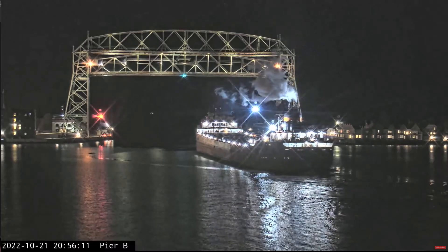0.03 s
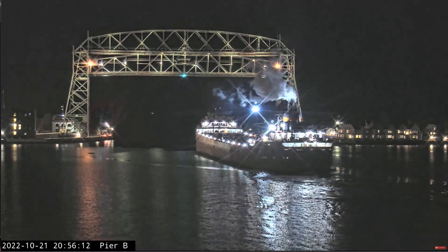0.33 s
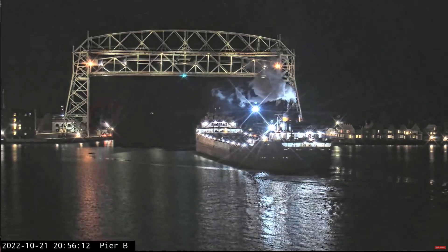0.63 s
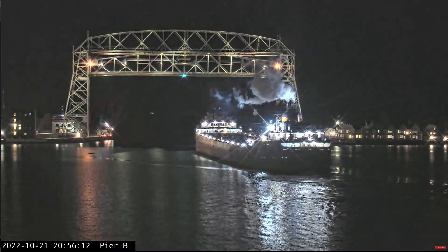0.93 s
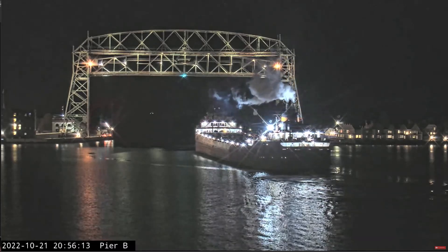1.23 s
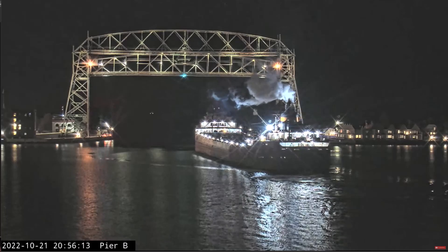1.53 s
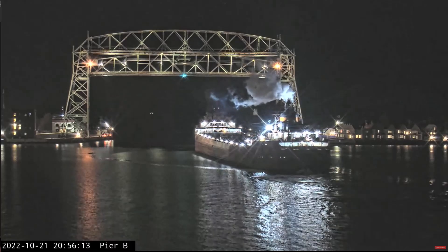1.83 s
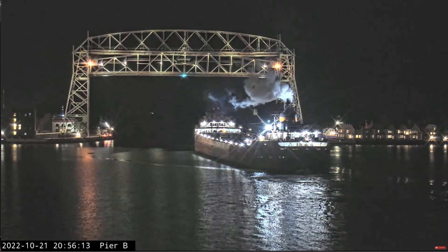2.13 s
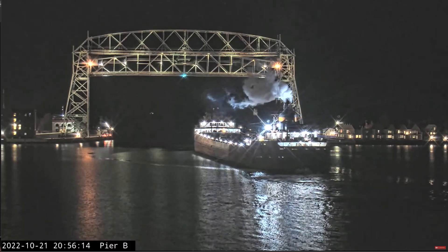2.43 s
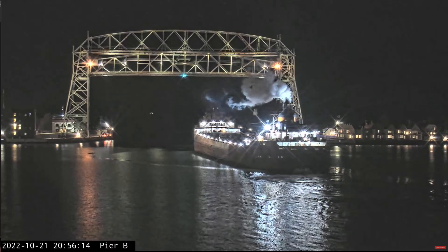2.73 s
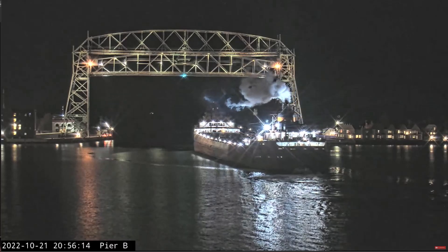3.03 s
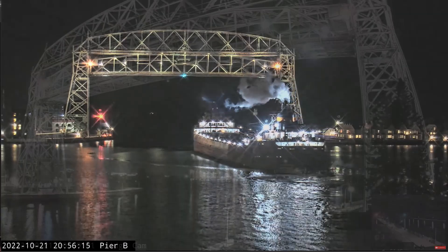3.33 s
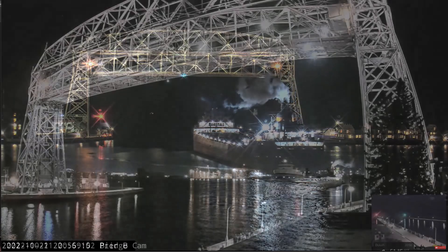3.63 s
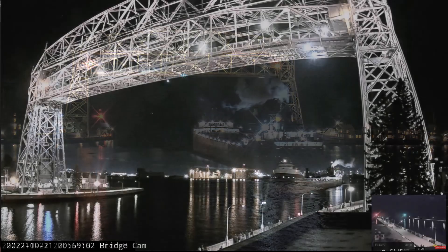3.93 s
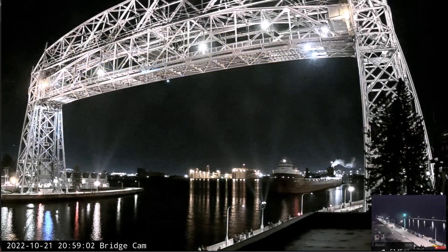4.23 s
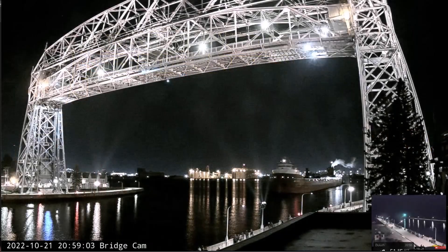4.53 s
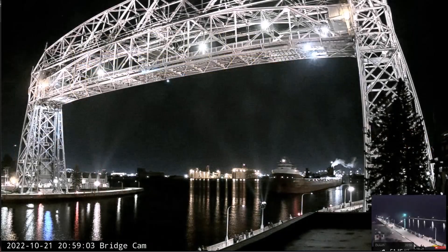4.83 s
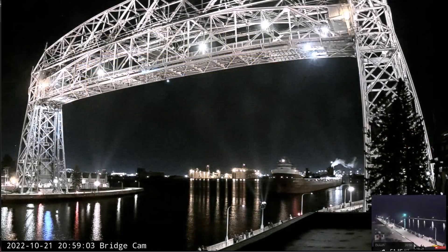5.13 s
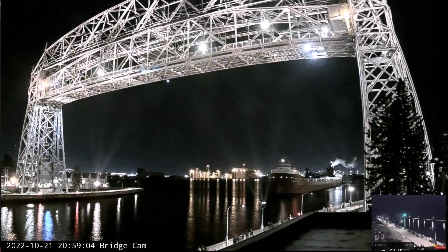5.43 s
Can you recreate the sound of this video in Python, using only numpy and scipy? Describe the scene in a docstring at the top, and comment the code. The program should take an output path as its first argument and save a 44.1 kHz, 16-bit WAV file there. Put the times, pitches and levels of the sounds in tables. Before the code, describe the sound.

Low steady harbor rumble and ship engine hum, interrupted by two thumping pops, then a brief hiss and an overloaded horn blast.

```python
"""A harbour at night, heard across the water. Far off a freighter's diesel drones under a steady rush.
At 1.0 s and 3.5 s two low electrical pops with a thin buzz cut in; faint, distant squeaks follow.
At 5.2 s compressed air hisses and whistles through a valve, and a large air horn speaks:
its diaphragm chops the air into a brassy note that scoops up to pitch and echoes off the quays,
so loud at the microphone that the input overloads."""
import sys
import numpy as np
from scipy import signal
from scipy.fft import rfft, irfft
from scipy.io import wavfile

SR = 44100
rng = np.random.default_rng(int(sys.argv[2]) if len(sys.argv) > 2 else 0)


def int16_out(signal):
    """Quantize to a 16-bit WAV file."""
    q = np.round(np.clip(np.atleast_2d(signal).T, -1, 1) * 32767)
    wavfile.write(sys.argv[1], SR, q.astype(np.int16))


N = 250047
TIME = np.arange(N) / SR
BINS = np.fft.rfftfreq(N, 1 / SR)
NOTE_HZ, BAND_LIMIT_HZ = 131.68, 15800
VALVE_S, FULL_SWING_S = 5.245, 5.374  # the valve cracks open; the diaphragm's swing levels off
BLAST = slice(round(VALVE_S * SR), N)


# The air horn at full pressure, loudest thing at the microphone: multiple of the pitch, relative level/dB
HORN_HARMONICS = [(1, -18.4), (2, -12.6), (3, -31), (4, -8.2), (5, -27.5), (6, -17.7), (7, -21.2),
                  (8, -19.5), (9, -20.5), (10, -22.3), (11, -43.6), (12, -33.3), (13, -37.1), (14, -26.7),
                  (15, -34.3), (16, -38), (17, -29), (18, -31.6), (19, -43.5), (20, -48.8), (21, -44),
                  (22, -42.5), (23, -41), (24, -39), (25, -45), (26, -64.0)]

def horn(scoop_hz=15, scoop_s=0.0121, waver=0.0007, dull_db_per_octave=9.5, shimmer_db=2.5):
    """The diaphragm chops the air; as its swing builds, the pitch rises and the tone brightens."""
    strength_db = 0.45 + swing_db()[BLAST]
    pitch = NOTE_HZ - scoop_hz * (1 - rise(FULL_SWING_S, scoop_s)[BLAST])
    pitch *= 1 + waver * drift(60, BLAST)
    angle = 2 * np.pi * np.cumsum(pitch) / SR
    # at low pressure the upper partials are weak
    tilt_db = -dull_db_per_octave * (1 - rise(middle_s=5.369, ease_s=.007)[BLAST])
    out = np.zeros(N)
    for k, db in HORN_HARMONICS:
        lag = 2.94 * np.log(k)  # phases are spread over the cycle to keep the peaks low
        shimmer = shimmer_db * k / len(HORN_HARMONICS) * drift(18, BLAST)  # from moving air
        level = gain_of(db + strength_db + tilt_db * np.log2(k) + shimmer)
        out[BLAST] += level * np.sin(k * (angle - lag))
    out[BLAST] += rasp(angle - lag, strength_db, tilt_db)
    return out


def swing_db(growth_db_per_s=433, knee_db=2):
    """The diaphragm's swing relative to its full size: steady growth that levels off."""
    return -knee_db * np.logaddexp(0, growth_db_per_s * (FULL_SWING_S - TIME) / knee_db)


# Rasp of the overloaded note, above the horn's main partials: f/Hz, relative level/dB
RASP_SPECTRUM = [(3500, -52), (4150, -48), (4500, -52), (5100, -46.5), (5700, -54.5), (7000, -52),
                 (7800, -61), (8600, -56.5), (9600, -64), (12500, -63.5), (15800, -69)]

def rasp(angle, strength_db, tilt_db, jitter_rad=0.0048, hiss_db=-45.5, pulse_depth=0.93):
    """Rough, buzzing treble of the overloaded note: ragged upper partials and hiss pulsing at the pitch."""
    jittered = angle + jitter_rad * drift(120, BLAST)
    partials = np.zeros_like(angle)
    for k in range(len(HORN_HARMONICS) + 1, int(BAND_LIMIT_HZ / NOTE_HZ)):
        db = 0.65 + level_at(RASP_SPECTRUM, k * NOTE_HZ) + strength_db + tilt_db * np.log2(k)
        ragged = .9 * rng.standard_normal()
        partials += gain_of(db) * np.sin(k * jittered + ragged)
    low_cut = 1 - np.exp(-(BINS / 2500) ** 4)
    hiss = noise(gain_of(level_at(RASP_SPECTRUM, BINS)) * low_cut)[BLAST]
    pulsing = gain_of(hiss_db + strength_db + tilt_db) * (1 - pulse_depth * np.sin(jittered))
    return partials + pulsing * hiss


# Rushing air, as coloured by the horn's flare: f/Hz, relative level/dB
FLARE_SPECTRUM = [(30, -6), (90, -4), (200, -9), (300, -2), (380, -8), (500, 1), (620, 1), (760, -9),
                  (1300, -11), (1480, -16), (1780, -12), (2130, -14), (2400, -21), (3500, -33), (7000, -40),
                  (16000, -54)]

def valve_air(leak_db=-45.5, leak_rise_s=.08, flow_db=-33.5):
    """Compressed air leaks in as the valve opens, then flows with the swing under the tone."""
    leak = gain_of(leak_db) * np.clip((TIME - VALVE_S) / leak_rise_s, 0, 1)
    flow = gain_of(flow_db + swing_db())
    return (leak + flow) * noise(gain_of(level_at(FLARE_SPECTRUM, BINS)))


# Resonances that the leaking air whistles in, at the horn: f/Hz, width/Hz, level/dB
VALVE_RESONANCES = [(2080, 120, -56), (1774, 130, -52.5), (1270, 90, -57), (585, 52, -48)]

def valve_whistles(rise_s=0.032):
    """The opening valve squeals until the diaphragm takes the air."""
    level = np.clip((TIME - VALVE_S) / rise_s, 0, 1) * (1 - gain_of(swing_db()))
    return level * sum(gain_of(db) * band(hz, width) for hz, width, db in VALVE_RESONANCES)


# The quays around the microphone, time for their echo to fall 60 dB: f/Hz, t/s
QUAY_DECAY = [(130, 1.8), (600, 1.5), (2500, 0.98), (8000, 0.16)]

def quay_echoes(blast, delay_s=0.017):
    """Scattered echoes from quays and bridge, the treble dying first."""
    hz, t, spectrum = signal.stft(rng.standard_normal(SR), SR, nperseg=256)
    decay = gain_of(-60 * t / level_at(QUAY_DECAY, hz)[:, None])
    tail = signal.istft(spectrum * decay, SR, nperseg=256)[1]
    tail = np.pad(tail / np.linalg.norm(tail), (round(delay_s * SR), 0))
    return signal.fftconvolve(blast, tail)[:N]


# Two low electrical pops with a thin buzz, cutting into the signal over the harbour sound:
# t/s, drop level/dB, recovery/s, spike as a share of the drop, buzz level/dB, buzz length/s
ELECTRICAL_POPS = [(1.048, -10.5, 0.043, .1, -49, 0.0084), (3.5142, -19, 0.034, 1.5, -51, 0.017)]

def pops(rise_s=0.0051, spike_s=0.006, rebound=0.27, rebound_s=0.069, buzz_hz=2930, grit=0.46):
    """At each glitch the signal drops, creeps back and overshoots; a gritty buzz rides on its edge."""
    out = np.zeros(N)
    angle = 2 * np.pi * buzz_hz * TIME + 0.27 * drift(300)
    buzz = unit_rms(sum(gain_of(-2.5 * k) * np.cos(k * angle) for k in range(1, 5)))
    buzz *= 1 + gain_of(-18) * 2 * np.cos(angle / 3)  # every third cycle is a little stronger
    for start, db, recovery_s, spike, buzz_db, buzz_s in ELECTRICAL_POPS:
        t = np.maximum(TIME - start, 0)
        onset = 1 - np.exp(-(t / rise_s) ** 2)
        drop = onset * (np.exp(-t / recovery_s) + spike * np.exp(-(t / spike_s) ** 2 / 2))
        overshoot = rebound * (t / rebound_s) ** 2 * np.exp(-t / rebound_s)
        edge = rise(start, ease_s=0.0014) / (1 + (t / buzz_s) ** 6)
        out += gain_of(db) * (overshoot - drop)
        out += gain_of(buzz_db) * edge * (buzz + grit * edge * rng.standard_normal(N))
    return out


# Tones of the freighter's machinery, far from the microphone: f/Hz, wander/Hz, rms level/dB
ENGINE_TONES = [(63.5, 1.8, -54), (77.4, 0.54, -51.5), (83.1, 0.9, -50.5), (85, 0.942, -56),
                (151.5, 1.15, -62), (175, 0.57, -64), (200.8, 0.83, -57.3), (214.7, 2.145, -60),
                (276, 1.42, -65.5), (283, 0.9, -59.5), (311, 0.99, -71), (589, 2.85, -68.5),
                (1273, 22, -75), (1740, 25, -81.5)]

def freighter(flutter_db=2.0):
    """The diesel and its fans drone, wavering a little across the water."""
    out = np.zeros(N)
    for hz, wander, db in ENGINE_TONES:
        angle = 2 * np.pi * (np.cumsum(hz + wander * drift(4)) / SR + rng.random())
        out += gain_of(db + flutter_db * drift(5)) * np.sqrt(2) * np.sin(angle)
    return out


# The harbour's bed of sound, a low rush and the hiss above it: f/Hz, relative level/dB
RUSH_SPECTRUM = [(4, 2), (25, -7.5), (42, -14.5), (55, -32), (75, -19.5), (105, -18), (190, -25.5),
                 (250, -27), (440, -28), (550, -20.5), (630, -27), (690, -33), (1000, -40.5), (1230, -41.5),
                 (1450, -49), (1750, -46), (2800, -65)]
HISS_SPECTRUM = [(1500, -10), (2900, -7), (3500, 0), (4100, -3), (4800, 1), (7000, 1), (8000, -9),
                 (11500, -11), (12500, -18), (16000, -21)]

def harbour(rush_db=-41, hiss_db=-78, swell_db=0.9):
    """A broad, gently swelling rush with a faint hiss on top."""
    swell = gain_of(swell_db * noise(1 / (1 + (BINS / 2) ** 2)))
    rush = noise(gain_of(level_at(RUSH_SPECTRUM, BINS)) / (1 + (BINS / 4000) ** 8))
    hiss = noise(gain_of(level_at(HISS_SPECTRUM, BINS)))
    return gain_of(rush_db) * swell * rush + gain_of(hiss_db) * hiss


# Faint squeaks from far across the water: start t/s, end t/s, f/Hz, width/Hz, level/dB
FAR_SQUEAKS = [(3.7, 3.78, 1860, 50, -76), (3.7, 3.88, 780, 50, -65), (4, 4.85, 1095, 70, -71.5),
               (4.07, 4.15, 2550, 70, -74.5), (4.148, 4.5, 2350, 700, -77), (4.449, 4.62, 1940, 300, -69.5),
               (4.67, 4.79, 2600, 260, -75.5)]

def squeaks():
    """Short breathy tones that swell and fade."""
    return sum(gain_of(db) * soft_gate(start, end) * band(hz, width)
               for start, end, hz, width, db in FAR_SQUEAKS)


def gain_of(db):
    """Decibels to a factor."""
    return np.exp(np.asarray(db) * (np.log(10) / 20))


def unit_rms(x):
    """Scales to an rms of one."""
    return x / np.sqrt(np.mean(x ** 2) + 1e-20)


def level_at(points, hz):
    """A table's value at hz, read on a log-frequency axis."""
    f, value = np.transpose(points)
    return np.interp(np.log(hz + 1), np.log(f + 1), value)


def noise(shape):
    """Noise of rms one with the given relative gain in each bin."""
    return unit_rms(irfft(rfft(rng.standard_normal(N)) * shape, N))


def band(hz, width):
    """Noise of rms one in a narrow band."""
    return noise(1 / (1 + (2 * (BINS - hz) / width) ** 4))


def drift(hz, part=slice(None), size=8192):
    """A smooth random curve of rms one that changes up to about hz times a second."""
    low_pass = 1 / (1 + (BINS[:size // 2 + 1] / hz) ** 4)
    slow = unit_rms(irfft(rfft(rng.standard_normal(size)) * low_pass))
    return np.interp(TIME[part], np.linspace(0, TIME[-1], size), slow)


def soft_gate(start, end, taper=0.81):
    """Fades in and out between two times."""
    gate = signal.windows.tukey(round((end - start) * SR), taper)
    return np.pad(gate, (round(start * SR), N))[:N]


def rise(middle_s, ease_s):
    """A smooth step from zero to one around a moment."""
    return .5 + .5 * np.tanh((TIME - middle_s) / (2 * ease_s))


def scene(echo_db=-22.5):
    """The horn and its echoes over the harbour, in mono, with electrical pops cutting into the signal."""
    blast = horn() + valve_air() + valve_whistles()
    echoes = gain_of(echo_db) * quay_echoes(blast)
    background = harbour() + freighter() + squeaks()
    return (blast + echoes + pops() + background)[None]


def record(dry, ceiling=.58):
    """The microphone's input overloads and flattens the horn's peaks; then the top treble is cut."""
    clipped = np.clip(dry, -ceiling, ceiling)
    low_pass = signal.firwin(1023, BAND_LIMIT_HZ, window=("kaiser", 9), fs=SR)
    return signal.oaconvolve(clipped, low_pass[None], "same")


dry = scene()
out = record(dry)
int16_out(out)
```